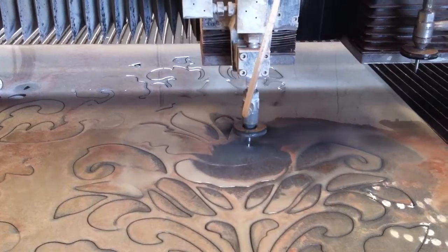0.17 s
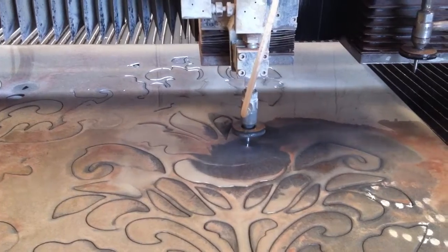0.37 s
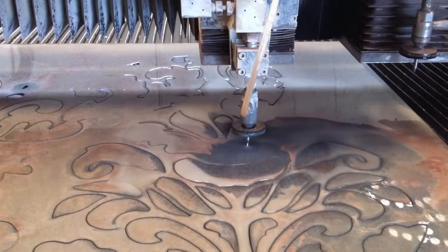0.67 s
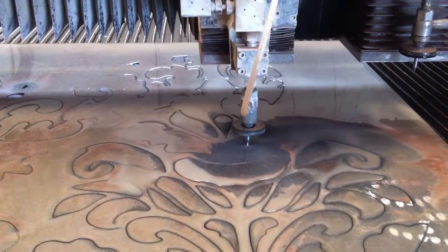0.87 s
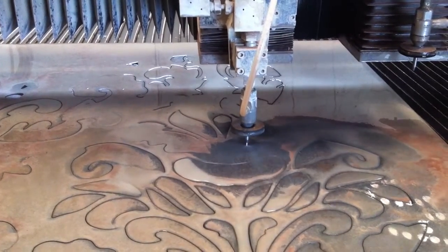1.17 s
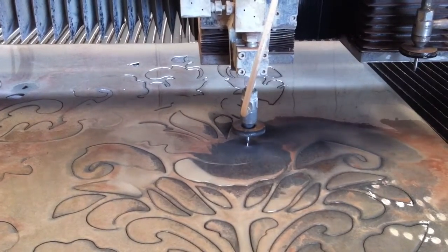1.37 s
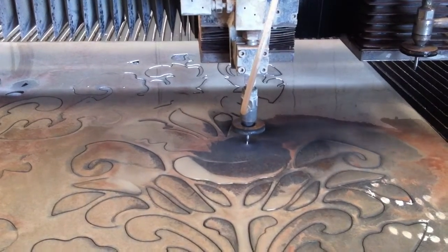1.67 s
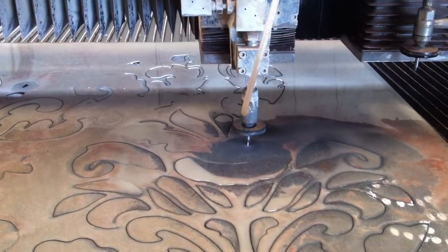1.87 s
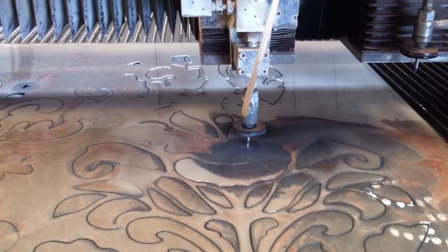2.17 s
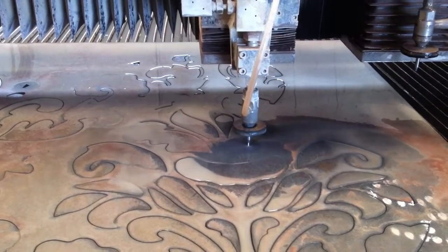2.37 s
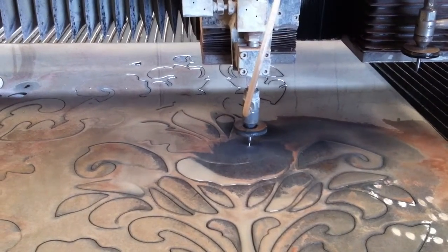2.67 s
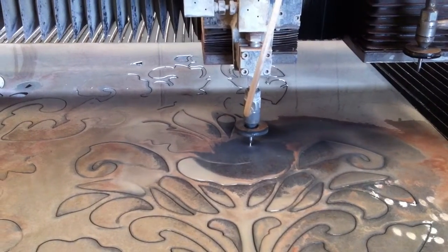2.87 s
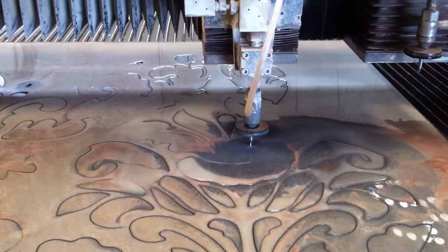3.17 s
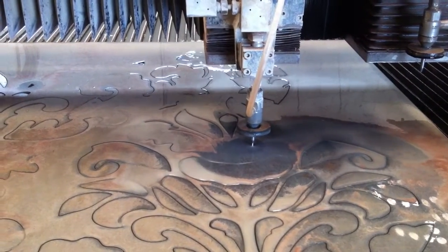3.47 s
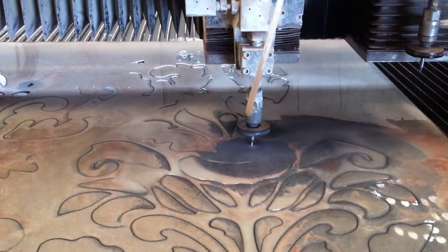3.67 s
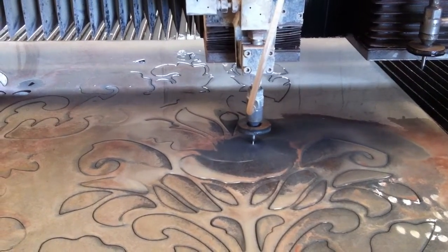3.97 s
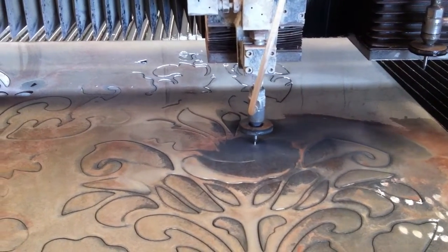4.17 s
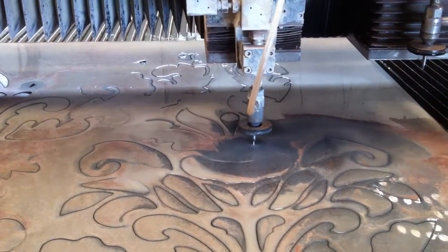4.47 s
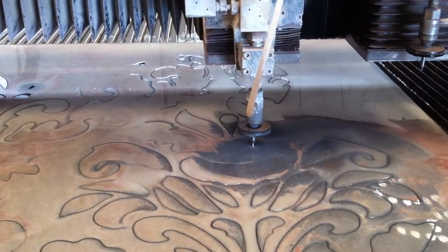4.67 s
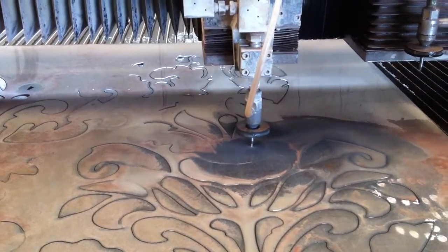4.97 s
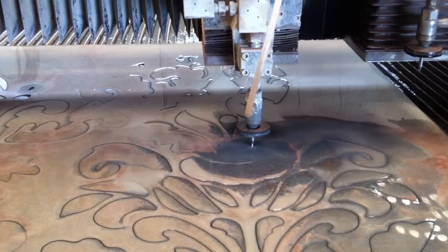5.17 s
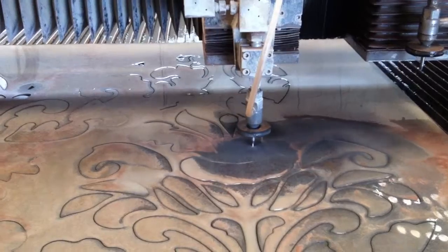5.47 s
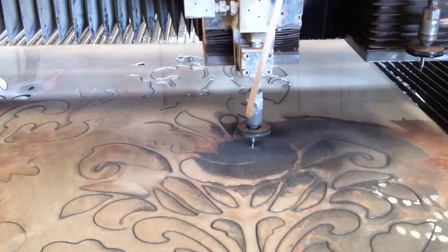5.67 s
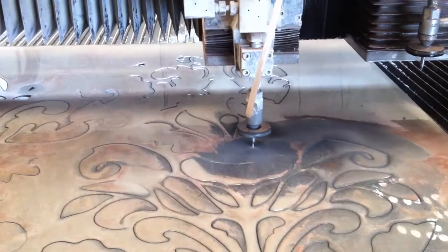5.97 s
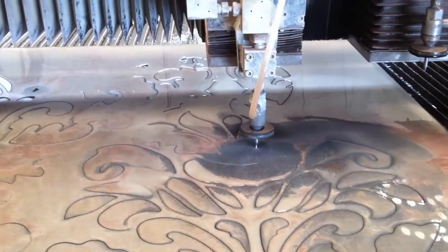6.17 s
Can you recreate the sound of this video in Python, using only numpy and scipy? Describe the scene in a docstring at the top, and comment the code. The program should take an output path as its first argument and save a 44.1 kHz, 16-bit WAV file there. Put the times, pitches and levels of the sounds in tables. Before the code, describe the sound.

An abrasive water jet cuts steel over a tank, heard through one close microphone with little bass. It begins as a smooth, gritty hiss, then quickly turns rough, roaring in irregular surges while spray sizzles and the nozzle whistles in short spits. Water churns underneath throughout, joined by scattered soft thumps and later small gurgles of trapped air. A faint workshop whine sits behind the unbroken cutting.

```python
"""A workshop, close to an abrasive water jet cutting steel plate over a tank; one mic, thin in the bass.
At first the jet runs cleanly through the slot with an even hiss, over churning water and a faint whine.
After about 0.7 s it bites into the steel and sputters: the slot roars in surges, the gap under the nozzle
whistles, and grit and spray sizzle. From about 1.5 s air pockets thump under the plate, and later
trapped air gurgles there too, while the cut goes on to the end."""
import sys
import numpy as np
from scipy import signal
from scipy.fft import rfft, irfft
from scipy.io import wavfile
from scipy.ndimage import uniform_filter1d

SR = 44100
rng = np.random.default_rng(int(sys.argv[2]) if len(sys.argv) > 2 else 0)


def waveform_to_disk(signal):
    """Save audio, clipped to [-1, 1], as 16-bit WAV at the path in sys.argv[1]."""
    frames = np.transpose(np.atleast_2d(signal))
    scaled = np.clip(frames, -1, 1) * 32767
    samples = np.round(scaled).astype(np.int16)
    wavfile.write(sys.argv[1], SR, samples)


N = 278712


def undb(db):
    """Decibels to gain."""
    return 10 ** (np.asarray(db) / 20)


def unit(x):
    """Scale to rms 1."""
    return x / np.sqrt(np.mean(x ** 2))


def curve(rows):
    """Join (time [s], value) points by straight lines, holding the first and last value."""
    times, values = np.transpose(rows)
    return np.interp(np.arange(N) / SR, times, values)


def spurts(events, attack_s=0.017, release_s=0.015):
    """Level change in dB from (time [s], length [s], change [dB]) events: each ramps, holds, returns."""
    t = np.arange(N) / SR
    return sum(db * np.clip((t - start) / attack_s, 0, 1)
               * np.clip(1 - (t - start - length) / release_s, 0, 1) for start, length, db in events)


def walk(rate):
    """Random wandering with rms 1, taking rate steps a second."""
    steps = rng.standard_normal(4096)
    return unit(np.interp(np.arange(N) / SR * rate, np.arange(len(steps)), steps))


def colour(x, points):
    """Filter by a spectrum of (frequency [Hz], relative level [dB]) points; rms 1."""
    hz, db = np.transpose(points)
    bins_hz = np.maximum(np.fft.rfftfreq(N, 1 / SR), 1)
    gain = undb(np.interp(np.log(bins_hz), np.log(hz), db))
    return unit(irfft(rfft(x) * gain, N))


def resonate(x, hz, width_hz):
    """A resonance applied twice, for steep skirts; rms 1."""
    b, a = signal.iirpeak(hz, hz / width_hz, fs=SR)
    return unit(signal.lfilter(b, a, signal.lfilter(b, a, x)))


def turbulence(rate, grit_db):
    """Rushing noise mixed with sharp impacts of drops and grit, rate of them a second."""
    impacts = (rng.random(N) < rate / SR) * rng.standard_normal(N)
    return unit(rng.standard_normal(N) + undb(grit_db) * unit(impacts))


def cavity(drive, modes, flicker_db, flicker_rate, tilt_db_per_octave=0):
    """Turbulence rings each resonance at its own spot, and each flickers by itself; rms 1."""
    out, centre_hz = 0, np.mean([mode[0] for mode in modes])
    for hz, width_hz, db in modes:
        local_drive = np.roll(drive, rng.integers(N))
        level_db = db + tilt_db_per_octave * np.log2(hz / centre_hz) + flicker_db * walk(flicker_rate)
        out = out + resonate(local_drive, hz, width_hz) * undb(level_db)
    return unit(out)


def delayed(x, delay_s, drift_s=0.00008, drift_rate=9):
    """A copy with a short, wavering delay; mixed with x it turns the hiss slightly phasey."""
    source_sample = np.arange(N) - (delay_s + drift_s * walk(drift_rate)) * SR
    return x[np.clip(np.round(source_sample).astype(int), 0, N - 1)]


def clean_jet(stir_db):
    """The jet passes straight through the slot: a gritty hiss that swells a little with the water below."""
    # resonances of the clear slot: (frequency [Hz], width [Hz], relative level [dB])
    clean_modes = [(1450, 270, -10.4), (2690, 680, 0), (3300, 620, -1), (4630, 680, -1), (5180, 550, -8.8),
                   (5900, 680, -1.5), (6640, 1000, -4.5), (8440, 1050, -3.5), (9120, 470, -7.7),
                   (10090, 680, -6.8), (10730, 460, 0), (11140, 620, -2), (12130, 800, -5.7),
                   (13170, 460, -11), (14070, 1030, -2.4), (15370, 1280, -3.3)]
    hiss = cavity(turbulence(rate=2000, grit_db=-4), clean_modes, flicker_db=0.5, flicker_rate=40)
    return hiss * undb(-7 + 0.38 * stir_db)


def tank(stir_db):
    """The spent jet plunges into the tank, churns the water and rings the air under the plate."""
    # resonances of the tank: (frequency [Hz], width [Hz], relative level [dB])
    tank_modes = [(231.5, 49, -3.5), (344, 208, 0.5), (523, 79, -9.5), (710, 570, 0), (1350, 910, 3.5),
                  (2080, 590, 0)]
    # trapped air gurgles: (time [s], length [s], rise [dB])
    gurgles = [(2.72, 0.12, 7), (3.13, .07, 6), (4.11, 0.12, 14), (6.0, .06, 8)]
    churn = cavity(turbulence(rate=450, grit_db=-2), tank_modes, flicker_db=1.9, flicker_rate=16)
    hollow = resonate(turbulence(rate=450, grit_db=-7), hz=938, width_hz=240)
    churn_db = stir_db - 3.5 + 1.18 * walk(rate=55) + 0.99 * walk(rate=22)
    hollow_db = spurts(gurgles) - 42.5 + 3.6 * walk(rate=30)
    return churn * undb(churn_db) + hollow * undb(hollow_db)


def workshop():
    """Room tone behind the cutter: a low rumble and two thin, unsteady machine tones."""
    # whine of the machine: (frequency [Hz], level [dB])
    tones = [(2108, -47), (2353, -44)]
    # spectrum of the room tone: (frequency [Hz], relative level [dB])
    room_spectrum = [(20, -2), (55, -7), (110, 16), (300, -6), (1500, 13), (8000, -28)]
    whine = sum(undb(db) * resonate(rng.standard_normal(N), hz, width_hz=16) for hz, db in tones)
    return whine + undb(-53) * colour(rng.standard_normal(N), room_spectrum)


def slot_roar(sputter, surge_db, lull_db):
    """The jet strikes the cutting front and rings the slot; a harder strike favours the high resonances."""
    # resonances of the slot while the jet bites: (frequency [Hz], width [Hz], relative level [dB])
    slot_modes = [(2640, 310, -1.5), (3334, 480, -1), (3780, 1500, -6), (4300, 630, 0.5), (5000, 1540, 1),
                  (5990, 340, -23)]
    # slow drift of the roar between surges: (time [s], level [dB])
    roar_drift = [(.8, -20), (1.1, -23.5), (1.55, -25), (2.1, -23.5), (2.9, -21.5), (4.2, -21.5),
                  (5.1, -20), (5.6, -19.5), (6.3, -19)]
    strike_db = curve(roar_drift) + surge_db + 1.7 * lull_db
    roar = cavity(turbulence(rate=2200, grit_db=-1.5), slot_modes, flicker_db=2, flicker_rate=45,
                  tilt_db_per_octave=0.21 * (strike_db - strike_db.mean()))
    return roar * undb(strike_db + 1.25 * sputter + 0.66 * walk(rate=38))


def nozzle_gap(sputter, lull_db):
    """The harder the gap under the nozzle is blown, the more its whistle stands out of the rush."""
    # slow drift of the blow through the gap: (time [s], blow [dB])
    blow_drift = [(.66, -31), (.85, -17.5), (1.13, -30), (1.33, -20), (3.0, -18), (3.9, -21), (4.5, -22.5),
                  (5.1, -18), (6.3, -22)]
    # backsplash spits through the gap: (time [s], length [s], rise in blow [dB])
    spits = [(0.695, 0.015, 23), (0.933, 0.013, 12.0), (0.98, 0.018, 12), (1.045, 0.017, 8),
             (1.085, 0.022, 13.5), (1.15, 0.035, 12), (1.208, 0.025, 8), (1.287, 0.051, 9),
             (1.373, 0.078, 4.4), (1.449, 0.024, 5), (1.666, 0.052, 4.5), (1.858, 0.081, 5),
             (1.953, 0.033, 4.7), (2.055, 0.034, 6.5), (2.15, 0.084, 4), (2.463, 0.036, 5.0),
             (2.567, 0.021, 8), (2.64, 0.024, 4), (2.76, 0.1, 1.5), (2.914, 0.089, 6), (3.148, 0.092, 3.5),
             (3.28, 0.027, 3), (3.563, 0.056, 3), (4.132, 0.042, 4.9), (4.82, 0.008, 3), (5.133, 0.057, 2),
             (5.648, 0.064, 4.5), (5.743, 0.031, 9), (6.086, 0.025, 7), (6.271, 0.026, 12)]
    # resonances around the whistle: (frequency [Hz], width [Hz], relative level [dB])
    gap_modes = [(8140, 950, -3), (8870, 1000, 1), (9900, 840, -5.5)]
    blow_db = curve(blow_drift) + spurts(spits) + 2.2 * lull_db + 0.85 * sputter + 1.62 * walk(rate=55)
    whistle = resonate(turbulence(rate=1500, grit_db=-13), hz=9070, width_hz=560)
    rush = cavity(turbulence(rate=3400, grit_db=-11), gap_modes, flicker_db=2.5, flicker_rate=60)
    return whistle * undb(1.29 * blow_db) + rush * undb(0.79 * blow_db - 7.5)


def fizz(count=5000, low_hz=2800, high_hz=13000, decay_cycles=30, glide=0.084):
    """Tiny bubbles in the wet slot: each rings briefly at its own pitch and rises a little."""
    out, age = np.zeros(N + 2048), np.arange(2048) / SR
    for when, pitch, strength in rng.random((count, 3)):
        hz = low_hz * (high_hz / low_hz) ** pitch
        life = age * hz / decay_cycles
        phase = 2 * np.pi * hz * age * (1 + glide * life / (2 + life) / 2)
        start = int(when * N)
        out[start:start + len(age)] += strength * life * np.exp(-life) * np.sin(phase)
    return unit(out[:N])


def spray(sputter, surge_db, lull_db):
    """Grit, drops and bubbles sizzle where the jet rebounds from the steel."""
    # spectrum of the spray: (frequency [Hz], relative level [dB])
    spray_spectrum = [(100, -45), (1000, -15), (3000, -6), (7500, -9), (9500, -3), (10300, -1.5),
                      (10700, 3), (11600, 0), (12300, 1.5), (13200, -3), (14100, -1), (15600, 1)]
    # sheets of spray thrown off the plate: (time [s], length [s], rise [dB])
    splashes = [(.675, 0.025, 8), (.9, 0.017, 7), (1.2, .03, 4), (2.305, .02, 1), (3.115, 0.028, 3),
                (4.305, 0.044, 1), (4.515, 0.027, 0), (4.79, .035, 6), (5.025, 0.039, 3.5),
                (6.09, 0.035, 1)]
    sizzle = colour(turbulence(rate=5800, grit_db=-5), spray_spectrum) + undb(-8.5) * fizz()
    # a short, wavering delayed copy gives the sizzle shifting, phasey peaks
    shifting_comb = undb(-6.5) * delayed(sizzle, delay_s=0.0013, drift_s=0.00012, drift_rate=14)
    level_db = -16.5 + spurts(splashes) + 0.2 * surge_db + lull_db
    return unit(sizzle + shifting_comb) * undb(level_db + 1.24 * sputter + 0.73 * walk(rate=8))


def free_jet():
    """The free jet adds a faint hiss in three flickering bands."""
    # bands of the hiss: (frequency [Hz], width [Hz], relative level [dB])
    bands = [(2510, 220, 0), (5960, 420, -1.5), (6530, 500, 0)]
    return undb(-27) * cavity(turbulence(rate=3000, grit_db=-10.5), bands, flicker_db=4.5, flicker_rate=21)


def biting_jet(surge_db, lull_db):
    """The jet rebounds from the steel; one fast sputter shakes slot, nozzle gap and spray together."""
    sputter = walk(rate=85) + walk(rate=330)
    return (slot_roar(sputter, surge_db, lull_db) + nozzle_gap(sputter, lull_db)
            + spray(sputter, surge_db, lull_db) + free_jet())


def slosh(stir_db):
    """The deflected jet heaves the water under the plate."""
    heave = resonate(turbulence(rate=99, grit_db=-10.5), hz=163, width_hz=94)
    return heave * undb(stir_db - 17 + 3.5 * walk(rate=14))


def thumps(rise_s=0.0046, decay_s=0.01, pocket_hz=185):
    """Each air pocket swings once or twice as it collapses, inside a short, dull splash."""
    # air pockets bursting under the plate: (time [s], relative level [dB])
    bursts = [(1.489, -22), (1.682, -18.5), (1.879, -26), (2.38, -26), (2.488, -21), (2.979, -27),
              (3.459, -21), (3.609, -28), (4.529, -19), (4.636, -21.5), (5.374, -19.5), (5.763, -20.5),
              (5.834, -17.5)]
    # spectrum of the splash: (frequency [Hz], relative level [dB])
    dull = [(30, -45), (60, -30), (95, -4), (160, -10), (260, 4), (500, 6), (1100, -3), (3000, -32)]
    splash = colour(rng.standard_normal(N), dull)
    out = np.zeros(N)
    for time_s, db in bursts:
        age = np.maximum(np.arange(N) / SR - time_s + rise_s, 0)
        swell = age ** 2 / (rise_s ** 2 + age ** 2) * np.exp(-age / decay_s)
        swell /= swell.max()
        hz = pocket_hz * np.exp(0.16 * rng.standard_normal())
        swing = np.sin(2 * np.pi * hz * age)
        out += undb(db) * (undb(-9) * splash * swell + undb(-8) * swing * swell ** 2)
    return out


def scene():
    """Jet and tank from close by, with their near reflections, over the room tone; both channels alike."""
    # the jet bites into the steel: (time [s], turbulent share of the flow [0-1])
    bite_share = [(0.64, 0.08), (0.71, 0.32), (0.8, 0.15), (0.85, 0.81)]
    # the jet catches on the cutting front: (time [s], length [s], rise of the roar [dB])
    surges = [(.808, 0.086, 6), (1.044, 0.019, 4.5), (1.144, 0.061, 6.5), (1.274, 0.037, 3),
              (1.386, .023, 6.5), (1.629, .075, 4), (1.929, 0.06, 6), (2.149, .09, 4.5), (2.291, 0.033, 8),
              (2.445, .035, 4), (2.547, .016, 5.5), (2.604, 0.033, 6), (2.86, 0.079, 3), (3.094, .08, 2.5),
              (3.429, 0.14, 4), (3.755, 0.061, 5.5), (4.074, 0.022, 7), (4.125, .11, 2.3),
              (4.481, .085, 5.3), (4.602, .06, 3.5), (4.78, 0.11, 4.5), (5.02, 0.08, 2.5), (5.302, .014, 5),
              (5.4, 0.069, 0), (5.544, 0.024, 4.3), (5.743, 0.024, 6), (5.887, .02, 3.3), (5.952, 0.02, 14),
              (6.236, 0.018, 5.5)]
    # the jet slips through freely and the cut eases: (time [s], length [s], change of the spray [dB])
    lulls = [(0.737, 0.087, -2.5), (0.943, 0.023, -4), (1.019, 0.01, -9), (1.915, 0.03, -3),
             (3.01, 0.07, -2.5), (4.374, 0.11, -2), (4.659, 0.06, -4), (4.909, 0.054, -3.5),
             (5.249, 0.051, -3.5), (5.522, 0.017, -4), (5.938, 0.025, -6.5)]
    # slow drift of the water stirred in the tank: (time [s], relative level [dB])
    stir_drift = [(0, -25), (.14, -22), (.2, -26.5), (1.2, -26.5), (2.9, -26.5), (4.3, -27.5), (5.4, -27.5),
                  (6.3, -27.5)]
    # reflections from plate, cutting head and gantry: (delay [s], level [dB])
    reflections = [(.0023, -22), (.0041, -20), (.0073, -19), (.0127, -19), (.021, -21)]
    bite = curve(bite_share)
    surge_db, lull_db = spurts(surges), spurts(lulls)
    stir_db = curve(stir_drift) + 0.28 * surge_db + 0.8 * lull_db
    clean = np.sqrt(1 - bite) * clean_jet(stir_db)
    biting = np.sqrt(bite) * (biting_jet(surge_db, lull_db) + slosh(stir_db))
    cutter = clean + biting + tank(stir_db) + thumps()
    echoes = sum(undb(db) * delayed(cutter, delay_s) for delay_s, db in reflections)
    # small surfaces do not reflect the bass
    echoes = signal.sosfilt(signal.butter(2, 400, "high", fs=SR, output="sos"), echoes)
    mix = cutter + echoes + workshop()
    return np.array([mix, mix])


def limit(x, threshold_db=-11, window_s=0.02, ceiling=0.82):
    """Fast gain control eases the loudest spurts; the tips of the waveform are rounded off."""
    power = uniform_filter1d(x ** 2, int(window_s * SR), axis=-1)
    held = x / (1 + (power / undb(threshold_db) ** 2) ** 4) ** (1 / 8)
    return held / (1 + (held / ceiling) ** 6) ** (1 / 6)


def record(dry, notch_hz=7380, notch_width_hz=800, notch_depth=0.45, bass_hz=65, top_hz=15780):
    """The mic has a hollow in the treble and thin bass; the recorder limits the level and cuts the top."""
    b, a = signal.iirpeak(notch_hz, notch_hz / notch_width_hz, fs=SR)
    heard = dry - notch_depth * signal.lfilter(b, a, dry)
    heard = signal.sosfilt(signal.butter(2, bass_hz, "high", fs=SR, output="sos"), heard)
    lowpass = signal.firwin(801, top_hz, window="blackman", fs=SR)
    return signal.fftconvolve(limit(heard), lowpass[None], "same", axes=1)


dry = scene()
out = record(dry)
waveform_to_disk(out)
```